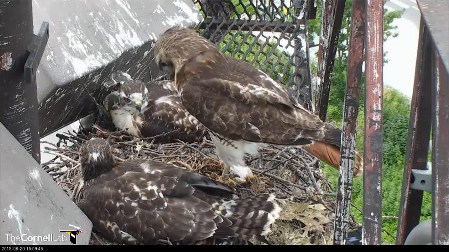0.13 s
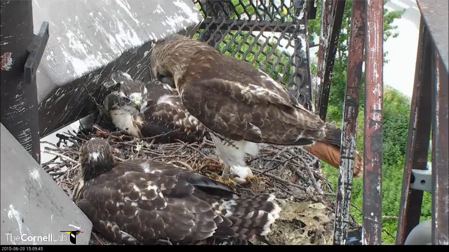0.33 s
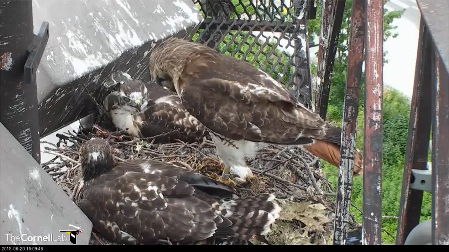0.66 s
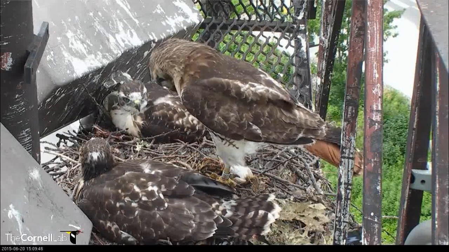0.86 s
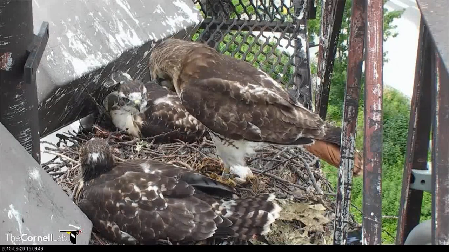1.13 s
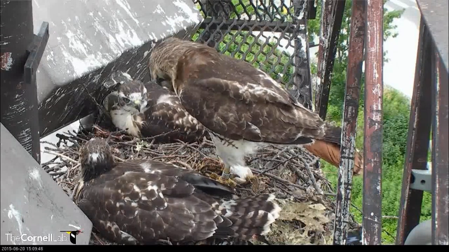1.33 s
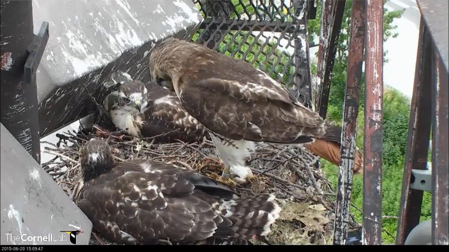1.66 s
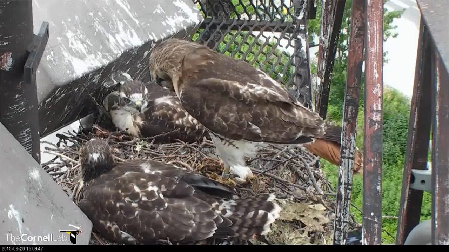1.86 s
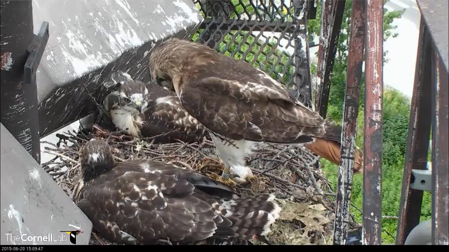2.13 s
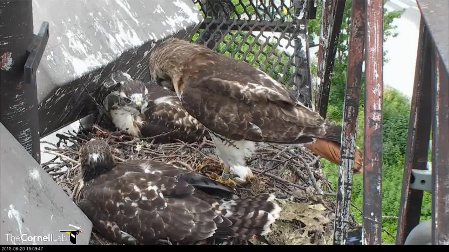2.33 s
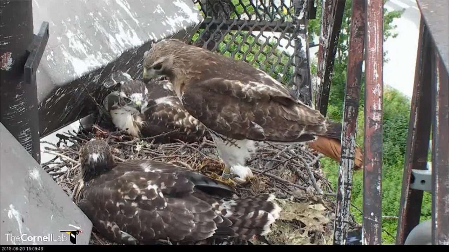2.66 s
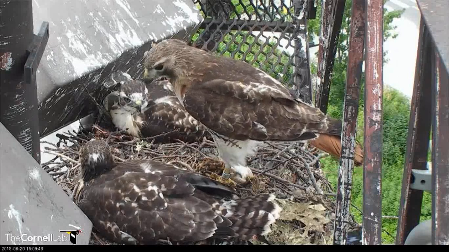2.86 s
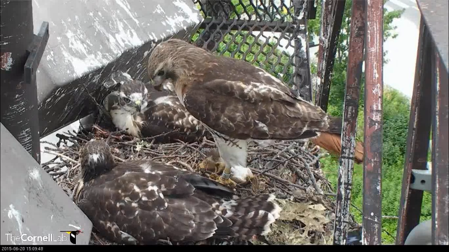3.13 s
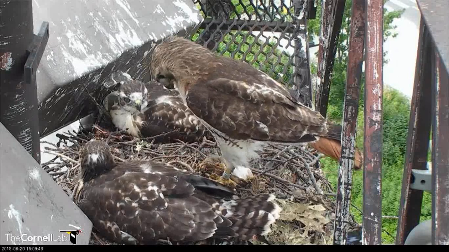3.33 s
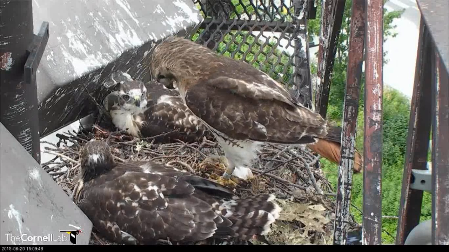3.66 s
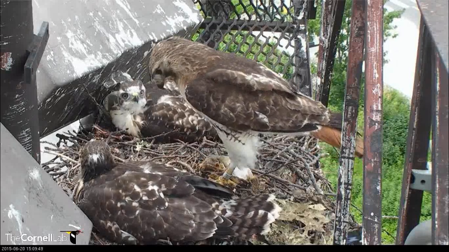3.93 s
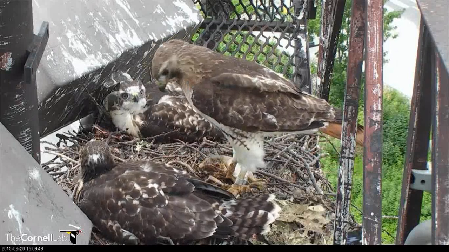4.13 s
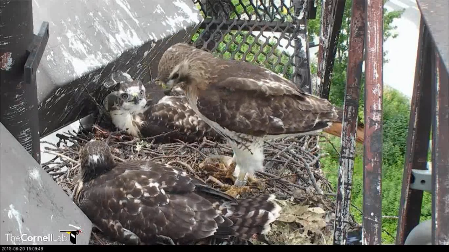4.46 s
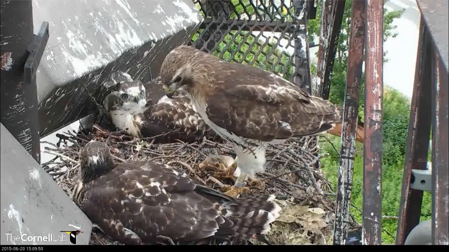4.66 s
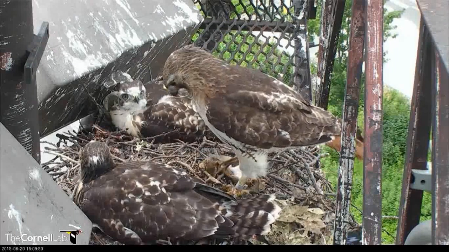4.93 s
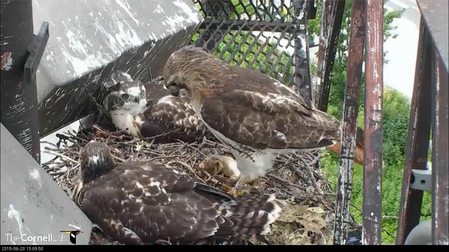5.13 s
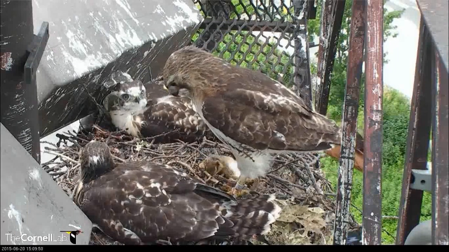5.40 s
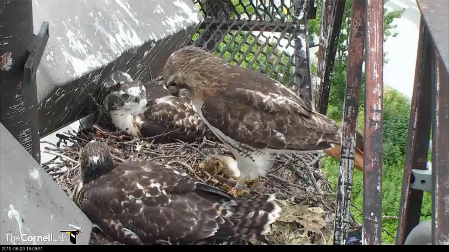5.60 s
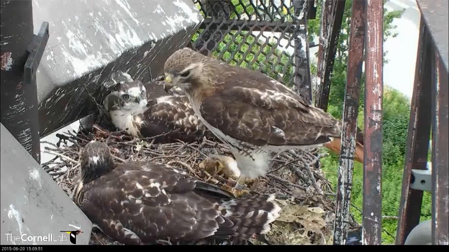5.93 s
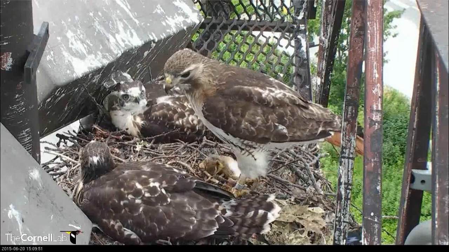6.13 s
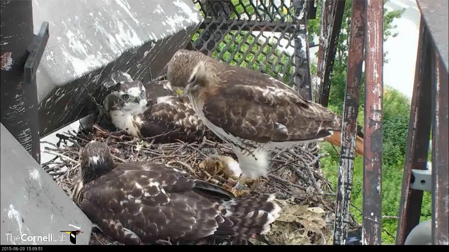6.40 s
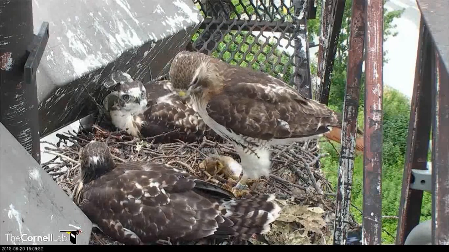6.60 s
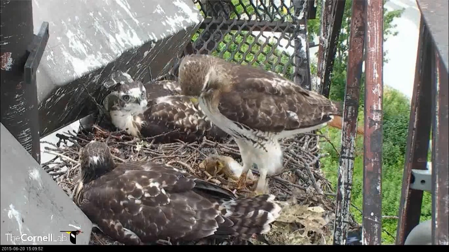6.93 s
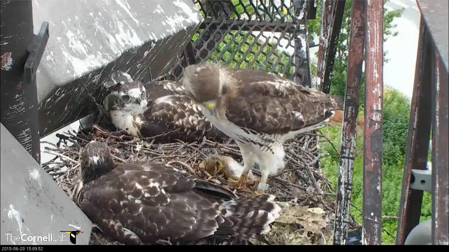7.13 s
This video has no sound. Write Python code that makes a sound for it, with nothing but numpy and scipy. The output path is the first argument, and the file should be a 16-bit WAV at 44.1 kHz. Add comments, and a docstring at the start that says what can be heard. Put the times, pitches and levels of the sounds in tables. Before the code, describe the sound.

Shrill nestling screams, thin arched whistles and rapid squeaky clucks repeat over low wind rumble and hiss; a distant wavering engine rises near the end.

```python
"""A nest on a steel light tower, where two hawk nestlings beg close to a fixed microphone.
They give long high screams, some dipping midway and some holding or climbing, that break downward; thin
arched whistles, quick chips, short slurs, one low whimper, and squeaks that drop into hoarse clucks.
Each voice is a gliding tone; screams, whistles and chips flare and fade as it crosses the voice's resonances.
Two dull bumps, wind and steady hiss are shaped noise; distant engines are wavering harmonics."""
import sys
import numpy as np
from scipy import signal
from scipy.fft import rfft, irfft
from scipy.io import wavfile

SR = 44100
rng = np.random.default_rng(int(sys.argv[2]) if len(sys.argv) > 2 else 0)


def transcribe(signal):
    """Save signal, clipped to [-1, 1], as a 16-bit WAV file at the path in sys.argv[1]."""
    frames = np.atleast_2d(signal).T
    limited = np.clip(frames, -1, 1)
    pcm = np.round(limited * 32767).astype(np.int16)
    wavfile.write(sys.argv[1], SR, pcm)


N = 320689  # length of the scene [samples]

# resonances that the pitch of a scream or whistle passes through: (pitch [Hz], level [dB])
VOICE_THROAT = [(2300, -14.5), (2480, -2.5), (2620, -2), (2680, -1.5), (2780, 4), (2900, -8), (3030, -11.5),
                (3160, -5.5), (3340, -13.5), (3460, -5), (3540, -11), (3600, -4), (3670, 0), (3790, -9),
                (4000, -6.5), (4400, 0.5), (4600, -23), (4770, -13), (5000, -18), (5600, -20)]
# squeaks that drop into a hoarse cluck: (time of the cluck [s], its pitch [Hz], its level before a boost [dB],
# time by which the squeak's downward flank leads [s], upward flank level [dB], downward flank level [dB]);
# the flanks are sounded with the chips, which are all turned down together
CLUCKS = [(2.103, 1207, -40, .021, -36, -14), (3.244, 818, -33, 0.013, -21, -23),
          (3.482, 798, -29.5, 0.0093, -40, -46), (3.722, 830, -26, .011, -32, -44),
          (3.933, 843, -24.5, .013, -40, -21), (4.159, 802, -30, 0.02, -42, -27),
          (4.405, 853, -24.5, .007, -29, -21), (4.627, 802, -28.5, 0.007, -26, -40),
          (4.823, 852, -18.5, 0.0087, -19, -15), (5.025, 843, -22.5, .01, -25, -24),
          (5.454, 825, -24, 0.03, -44, -18)]
# colour of broad rushing noise, in the wind and in the engine's roar: (frequency [Hz], relative level [dB])
RUSH_COLOUR = [(50, -9.5), (100, 6.5), (180, 4), (290, -0.5), (400, -3.5), (520, -8.5), (700, -15),
               (1000, -28), (1500, -38), (2500, -57)]


def undb(db):
    """Turn decibels into gain."""
    return 10 ** (np.asarray(db) / 20)


def unit(x):
    """Scale to an rms (average strength) of 1."""
    return x / np.sqrt(np.mean(x ** 2))


def shape_db(points, hz):
    """Read a level from (frequency [Hz], level [dB]) points, joined by lines on a log-frequency axis."""
    f, db = np.transpose(points)
    return np.interp(np.log(np.maximum(hz, 1)), np.log(f), db)


def noise(points, size):
    """Noise of rms 1: random samples whose spectrum is shaped by the given points."""
    hz = np.fft.rfftfreq(size, 1 / SR)
    spectrum = rfft(rng.standard_normal(size)) * undb(shape_db(points, hz))
    return unit(irfft(spectrum, size))


def wander(rate, size):
    """Smooth random curve of rms 1 that changes about rate times a second."""
    hz = np.fft.rfftfreq(size, 1 / SR)
    spectrum = rfft(rng.standard_normal(size)) * np.exp(-.5 * (hz / rate) ** 2)
    return unit(irfft(spectrum, size))


def phase_of(hz):
    """Running phase of a moving pitch."""
    return 2 * np.pi * np.cumsum(hz) / SR


def fade(size, fade_s):
    """Gain that opens and closes softly."""
    t = np.arange(size) / SR
    nearest_end_s = np.minimum(t, t[-1] - t)
    return np.sin(np.pi / 2 * np.clip(nearest_end_s / fade_s, 0, 1)) ** 2


def note(rows, fade_s):
    """Start time, pitch and softly opened and closed gain of a (time [s], pitch [Hz], level [dB]) curve."""
    s, hz, db = np.transpose(rows)
    t = np.arange(s[0] - fade_s / 2, s[-1] + fade_s / 2, 1 / SR)
    nearest_end_s = np.minimum(t - t[0], t[-1] - t)
    gate = np.sin(np.pi / 2 * np.clip(nearest_end_s / fade_s, 0, 1)) ** 2
    return t[0], np.interp(t, s, hz), gate * undb(np.interp(t, s, db))


def add(out, start_s, x):
    """Mix x into out from start_s on."""
    i = max(int(start_s * SR), 0)
    x = x[:max(N - i, 0)]
    out[i:i + len(x)] += x


def syrinx(hz, jitter, shimmer_db):
    """A bird's vocal membrane: the phase and flutter of a tone whose pitch and strength tremble."""
    size = len(hz)
    phase = phase_of(hz * (1 + jitter * wander(110, size)))
    flutter = np.sqrt(2) * undb(shimmer_db * wander(84, size))
    return phase, flutter


def screams():
    """A nearly pure tone with a weak octave; it turns rough as it breaks downward, and air rasps along."""
    # long screams: (start [s], first pitch point [s], its pitch [Hz], pitch midway [Hz],
    # latest second pitch point [s], its pitch [Hz], pitch shortly before the break [Hz], break [s],
    # high-pitch level [dB], level after the break [dB], octave level [dB]); levels are before the throat
    scream_rows = [(0.525, 0.594, 3747, 3583, 0.74, 3676, 3420, .808, -21, -15.5, -23.5),
                   (1.434, 1.556, 3588, 3636, 1.71, 3678, 3196, 1.805, -21, -19.5, -17),
                   (2.598, 2.678, 3528, 3406, 2.825, 3650, 3305, 2.968, -23, -25.5, -17.5),
                   (3.687, 3.769, 3517, 3588, 3.915, 3686, 3310, 4.057, -22, -22, -13.5),
                   (4.787, 4.984, 3720, 3506, 5.075, 3577, 3480, 5.122, -21, -18, -20),
                   (5.904, 6.006, 3660, 3663, 6.14, 3760, 3390, 6.255, -24, -25, -25)]
    # how the throat passes the octave: (frequency [Hz], level [dB])
    octave_throat = [(4500, -29), (5900, -13), (6500, -1), (7000, 0.5), (7400, -2.5), (7700, -6)]
    rasp_colour = [(1500, -15.5), (2200, -4.5), (2600, 7), (3000, -6.5), (3700, -5),
                   (4600, -24), (5800, -40.5), (6600, -11.5), (7500, -23)]
    accent_start_db, accent_s = 5.5, 0.021  # extra push at the start, and how fast it passes
    out = np.zeros(N)
    for *contour, high_db, low_db, octave_db in scream_rows:
        t, hz = scream_pitch(*contour)
        size = len(hz)
        hz = hz * (1 + 0.0022 * wander(23, size))
        slack = np.clip((3350 - hz) / 500, 0, 1)  # the membrane loses tension at low pitch
        phase, flutter = syrinx(hz, jitter=.0014 + .005 * slack, shimmer_db=.6 + 1.2 * slack)

        accent_db = accent_start_db * np.exp(-(t - t[0]) / accent_s)
        stutter_db = 2.0 * slack * wander(35, size)
        level_db = high_db + slack * (low_db - high_db) + shape_db(VOICE_THROAT, hz)
        gain = fade(size, 0.0099) * undb(level_db + stutter_db + accent_db)
        effort = np.sqrt(gain * gain.mean())  # the octave and the rasp swell less than the tone

        tone = gain * flutter * np.sin(phase)
        octave_level_db = octave_db + shape_db(octave_throat, 2 * hz) + 2.53 * wander(46, size)
        octave = (1 - slack) * undb(octave_level_db) * np.sin(2 * phase)
        rasp = undb(-12.0 - 2.6 * slack) * noise(rasp_colour, size)
        add(out, t[0], tone + effort * (flutter * octave + rasp))
    return out


def scream_pitch(start, first, first_hz, midway_hz, second, second_hz, shoulder_hz, breaks):
    """Times and pitch of a scream: a climb, a dip, hold or climb midway, then a flip down and a slide away."""
    onset_hz, break_hz, low_register_hz, end_hz = 3320, 3130, 2786, 2314
    shoulder_s = 0.025  # time before the break at which the voice begins to give way
    flip_s, slide_s = .013, 0.052  # length of the flip, and of the slide after it
    second = min(second, breaks - shoulder_s - .015)  # the voice always sinks before it breaks
    knots = [(start, onset_hz), (first, first_hz), ((first + second) / 2, midway_hz), (second, second_hz),
             (breaks - shoulder_s, shoulder_hz), (breaks, break_hz), (breaks + flip_s, low_register_hz),
             (breaks + flip_s + slide_s, end_hz)]
    s, hz = np.transpose(knots)
    t = np.arange(s[0], s[-1], 1 / SR)
    climb = np.minimum((t - start) / (first - start), 1)
    bow_hz = 70 * np.sin(np.pi * climb)  # the first climb is quick, then eases
    return t, np.interp(t, s, hz) + bow_hz


def whistles():
    """The pitch of a soft tone eases to a crest and drops ever faster; the highest notes waver."""
    # thin arched whistles and peeps: (start [s], rise [s], fall [s], first pitch [Hz], crest pitch [Hz],
    # last pitch [Hz], level before the throat [dB])
    whistle_rows = [(.338, 0.031, 0.16, 5380, 5470, 4180, -32.5), (1.1, 0.11, 0.016, 3180, 3460, 3360, -28),
                    (1.223, 0.036, 0.021, 3365, 3450, 3100, -21),
                    (1.285, 0.024, 0.13, 5200, 5120, 3870, -37),
                    (1.89, 0.081, 0.062, 3040, 3135, 3070, -32),
                    (2.355, 0.04, 0.061, 4690, 5040, 4860, -41),
                    (2.46, 0.094, 0.038, 4830, 5040, 4000, -36),
                    (3.441, 0.069, .175, 5200, 5370, 4340, -38), (4.55, 0.082, 0.13, 5060, 5280, 5030, -36),
                    (5.163, 0.13, 0.032, 3430, 4166, 3380, -22),
                    (5.595, 0.09, 0.1274, 3200, 4960, 3700, -25),
                    (5.649, 0.065, .19, 5140, 5570, 4360, -32),
                    (6.709, 0.019, 0.045, 3166, 4290, 3680, -22.5),
                    (6.765, 0.013, .055, 3947, 3950, 3080, -31.5),
                    (6.852, .022, 0.026, 3157, 3360, 3130, -22.5),
                    (7.175, 0.063, .04, 4780, 4790, 4780, -43.5)]
    drop_power = 3.0  # power of time by which the pitch falls from its crest
    swell_range_db, drop_fade_db = 3, 3  # growth from start to end, and loss as the pitch drops away
    out = np.zeros(N)
    for start, rise_s, fall_s, first_hz, top_hz, last_hz, db in whistle_rows:
        t = np.arange(0, rise_s + fall_s, 1 / SR)
        rising = np.sin(np.pi / 2 * np.minimum(t / rise_s, 1)) ** 2
        falling = np.maximum((t - rise_s) / fall_s, 0) ** drop_power
        hz = first_hz + (top_hz - first_hz) * rising + (last_hz - top_hz) * falling
        thin = np.clip((hz - 4000) / 1000, 0, 1)  # 1 for the highest notes
        hz = hz * (1 + 0.0043 * thin * wander(22, len(t)))

        swell_db = swell_range_db * (t / t[-1] - .5) - drop_fade_db * falling
        waver_db = (1.5 + 1.2 * thin) * wander(30, len(t))
        gain = fade(len(t), 0.0041) * undb(db + shape_db(VOICE_THROAT, hz) + swell_db + waver_db)
        add(out, start, soft_voice(hz, gain))
    return out


def soft_voice(hz, gain):
    """A softer, wavering tone; at low pitch it carries an octave."""
    hz = hz * (1 + .005 * wander(25, len(hz)))  # an unsteady young voice
    phase, flutter = syrinx(hz, jitter=0.0059, shimmer_db=3.0)
    octave_db = shape_db([(4600, -20.0), (5600, -24.0), (6300, -36.5)], 2 * hz)
    octave = undb(octave_db) * np.sin(2 * phase)
    effort = np.sqrt(gain / undb(-26.0))  # soft notes are nearly pure
    return gain * flutter * (np.sin(phase) + effort * octave)


def chips(loudest_hz=4400, lead_s=.0095, tail_s=0.02):
    """The pitch arches steeply up and back, its top too high and faint to hear; each flank flashes in the throat."""
    # loudness of a chip along its glide: (pitch [Hz], level [dB])
    chip_throat = [(2300, -30.5), (2700, -14), (3300, -13.5), (3900, -10.5), (4400, 0.5), (4800, -18.5),
                   (5300, -25), (6300, -32), (7200, -61)]
    out = np.zeros(N)
    t = np.arange(-lead_s, tail_s, 1 / SR)
    gate = np.interp(t, [-lead_s, -.4 * lead_s, .7 * tail_s, tail_s], [0, 1, 1, 0]) ** 2
    for s, db, glide in flanks():
        hz = loudest_hz * 2 ** np.clip(glide * t, -1, 1)
        phase, flutter = syrinx(hz, jitter=0.016, shimmer_db=2.4)
        rattle = 1 + .25 * wander(350, len(t))
        gain = undb(db + shape_db(chip_throat, hz)) * gate
        chip = gain * flutter * rattle * np.sin(phase)
        add(out, s + t[0], glance(chip, strength_db=-17))
    return out * undb(-4.5)


def flanks():
    """Time [s], level [dB] and glide [octaves per s] of both flanks of every chip and squeak."""
    # chips: (time of the upward flank [s], time until the downward one [s], upward level [dB],
    # downward level [dB], downward glide [octaves per s]); chips() turns all levels down together
    chip_rows = [(.061, 0.067, -19, -15, -34), (.253, .043, -13, -12.5, -41), (.644, .05, -17, -15.5, -35),
                 (.837, 0.046, -17, -13.5, -29), (1.024, 0.044, -15.5, -10.5, -38),
                 (3.01, 0.056, -16, -13.5, -26), (3.18, .042, -17, -14, -32),
                 (3.364, 0.039, -25.5, -17, -33.5), (3.57, .043, -16, -15, -39),
                 (3.785, .046, -22, -12.5, -33), (3.987, .049, -28, -15, -27),
                 (4.301, 0.053, -13.5, -17, -31.5), (4.511, 0.051, -15, -13.5, -32),
                 (4.726, 0.046, -12.5, -12.5, -31)]
    rise_glide, squeak_fall_glide = 61, -27.5  # [octaves per s]
    squeak_s = .071  # from a squeak's upward flank to its downward one
    for s, gap_s, up_db, down_db, fall_glide in chip_rows:
        yield s, up_db, rise_glide
        yield s + gap_s, down_db, fall_glide
    for s, _, _, lead_s, up_db, down_db in CLUCKS:
        yield s - lead_s - squeak_s, up_db, rise_glide
        yield s - lead_s, down_db, squeak_fall_glide


def clucks(glide=-8, attack_s=0.0046, release_s=0.0047):
    """The voice drops into a low register for a few rough cycles, rich in harmonics."""
    # throat shape in a cluck: (frequency [Hz], level [dB])
    cluck_throat = [(850, -31.5), (1300, -17.5), (1700, -8), (2500, -6), (3300, 1.5), (4200, -24.5),
                    (5000, -32.5), (7000, -41.5)]
    out = np.zeros(N)
    t = np.arange(-SR // 50, SR // 50) / SR
    swell = np.exp(-.5 * (t / np.where(t < 0, attack_s, release_s)) ** 2)
    for s, pitch, db, *_ in CLUCKS:
        hz = pitch * 2 ** (glide * t)  # glide in octaves per s
        phase, flutter = syrinx(hz, jitter=0.018, shimmer_db=3.5)
        voice = np.zeros(len(t))
        for k in range(1, 9):
            harmonic_db = shape_db(cluck_throat, k * hz) + 2 * wander(270, len(t))
            voice += undb(harmonic_db) * np.sin(k * phase)
        cluck = undb(db + 2.5) * swell * flutter * voice
        add(out, s + t[0], glance(cluck, strength_db=-18.5))
    return out


def glance(x, strength_db):
    """A few near surfaces throw a short call back; the paths change as the head turns, drawn anew per call."""
    paths = rng.uniform(size=(5, 2))
    lag = (.004 + .02 * paths[:, 0]) * SR
    echoes = np.zeros(SR // 30)
    echoes[lag.astype(int)] = undb(strength_db) * (1 - paths[:, 0] / 2) * np.sign(paths[:, 1] - .5)
    echoes[0] = 1  # the direct sound
    return signal.fftconvolve(x, echoes)


def whimper():
    """The same soft voice as the whistles, held low and wavering, around the last scream."""
    # the whimper's path: (time [s], pitch [Hz], level [dB])
    whimper_path = [(5.82, 2850, -34), (5.85, 3000, -33), (5.906, 2670, -27), (5.945, 2814, -29),
                    (6.006, 2466, -24.5), (6.069, 2315, -27.5), (6.157, 2650, -31.5), (6.173, 2250, -37),
                    (6.193, 2290, -35)]
    out = np.zeros(N)
    start, hz, gain = note(whimper_path, fade_s=0.013)
    waver = undb(1.8 * wander(30, len(hz)))
    add(out, start, soft_voice(hz, gain * waver))
    return out


def slurs():
    """Short slurred tones: soft whines, and the low tail ends of falling chips and squeaks."""
    # slurs: (start [s], length [s], first pitch [Hz], last pitch [Hz], level [dB])
    slur_rows = [(0.15, 0.013, 2840, 2350, -31.5), (2.1, 0.0089, 2580, 2100, -27.5),
                 (2.15, 0.057, 2760, 2680, -38), (2.466, 0.097, 2110, 1670, -46.5),
                 (2.888, 0.063, 1580, 1730, -46), (2.949, .15, 1530, 1380, -48),
                 (4.172, 0.045, 2920, 2750, -46.5), (5.057, 0.034, 2450, 2620, -28),
                 (5.432, 0.014, 2930, 2300, -21.5), (5.452, 0.13, 3340, 2870, -45),
                 (5.609, 0.088, 2870, 2826, -36.5), (5.719, .022, 3410, 3070, -37.5),
                 (5.744, 0.047, 2620, 2250, -34), (5.811, 0.086, 3280, 3090, -38.5),
                 (6.333, .032, 2495, 2520, -33.5), (6.403, 0.041, 2560, 2563, -38),
                 (7.2, 0.045, 2950, 2670, -35)]
    out = np.zeros(N)
    for s, length, first_hz, last_hz, db in slur_rows:
        start, hz, gain = note([(s, first_hz, db), (s + length, last_hz, db)], fade_s=0.0088)
        phase, flutter = syrinx(hz, jitter=0.0031, shimmer_db=3.0)
        add(out, start, gain * flutter * np.sin(phase))
    return out


def tower(x, t60_s=0.1, echo_db=-19):
    """Beams and grating scatter a short, faint tail of noise that dies away by 60 dB in t60_s."""
    t = np.arange(SR // 3) / SR
    tail = noise([(1000, -4.5), (2700, 7.5), (3600, 6.5), (5000, -6.5), (8000, -15.0), (12000, -33.5)], len(t))
    tail = tail * undb(-60 * t / t60_s) * (t > .002)
    tail = tail / np.abs(rfft(tail))[:len(t) // 6].mean()  # set its mean strength over the lower spectrum to 1
    return x + undb(echo_db) * signal.fftconvolve(x, tail)[:N]


def bumps():
    """The adult shifts its weight on the nest; packed sticks give a short, low knock without a ring."""
    # bumps: (time [s], level [dB], decay [s])
    bump_rows = [(2.267, -5, 0.0086), (3.431, -12.5, 0.011)]
    # colour of the knock: (frequency [Hz], relative level [dB])
    bump_colour = [(100, -3.5), (280, 5), (500, 0), (750, -14.5), (1200, -27), (2500, -59)]
    out = np.zeros(N)
    t = np.arange(SR // 10) / SR
    for s, db, decay in bump_rows:
        envelope = np.minimum(t / 0.0016, 1) * np.exp(-t / decay)
        add(out, s, undb(db) * envelope * noise(bump_colour, len(t)))
    return out


def wind():
    """Deep buffeting and a broader rush at the microphone follow the same gusts and sway in quick eddies."""
    # strength of the gusts: (time [s], level [dB])
    gusts = [(0, -16.5), (.22, -11), (.31, -26), (.43, -12), (.75, -17), (1.07, -16.5), (1.27, -7.5),
             (1.36, -16), (1.66, -10.5), (1.82, -14), (2.47, -8), (2.599, -16.5), (3.48, -20.5),
             (3.81, -22.5), (4.58, -20.5), (4.68, -25.5), (5.3, -17), (5.56, -26.5), (6.14, -26.5),
             (7.27, -28)]
    # colour of the buffeting: (frequency [Hz], relative level [dB])
    buffet_colour = [(12, -18), (28, 12.5), (50, 11), (80, 5.5), (130, -1.5), (200, -19.5), (400, -67.5)]
    gust_db = np.interp(np.arange(N) / SR, *np.transpose(gusts))
    eddies = wander(26, N)
    buffet = undb(-0.5 + gust_db + 1.8 * eddies) * noise(buffet_colour, N)
    # the rush follows only 0.6 of the gusts' swing in dB
    rush = undb(-11 + 0.6 * gust_db + 2.55 * eddies) * noise(RUSH_COLOUR, N)
    return buffet + rush


def air():
    """Smooth hiss of the open surroundings: shaped noise that sways very slightly."""
    # colour of the hiss: (frequency [Hz], relative level [dB])
    air_colour = [(400, 0), (800, 0), (1300, -7.5), (1700, -11.5), (2100, -11.5), (2400, -4), (2680, 2),
                  (3050, -6), (3900, -11.5), (4700, -25), (5600, -27), (6500, -26), (7400, -31.5),
                  (9000, -36)]
    sway_db = .4 * wander(2, N)
    return undb(-36 + sway_db) * noise(air_colour, N)


def traffic(full_db=-17):
    """Far engines: low harmonics that waver on their way through moving air; the deepest arrive first."""
    # distant engine: (time [s], pitch of its third harmonic before the waver [Hz], level [dB])
    engine_path = [(5.65, 293, -50), (5.93, 295.3, -35.5), (6.08, 267.3, -23), (6.27, 305.6, -15.5),
                   (6.32, 283.4, -20), (6.39, 324.2, -14.5), (6.46, 263.7, -16), (6.55, 314.4, -17.5),
                   (6.66, 255.6, -18), (6.76, 280.9, -19), (7.05, 267, -21.5), (7.27, 286.3, -20.5)]
    # its harmonics: (multiple of the firing rate, level at full swell [dB],
    # share of the swell that it follows, phase blur [rad])
    engine_orders = [(1, -10, 0.041, 0.53), (2, -5.5, 0.31, 1), (3, 0.5, 1, 0.75), (4, -13, 1, 1.7)]
    # a faint motor pulling away far off: (time [s], pitch of its third harmonic [Hz], level [dB])
    far_motor_path = [(2.95, 355, -49), (3.25, 376, -31.5), (3.5, 397, -33), (3.7, 410, -37),
                      (3.9, 395, -43)]
    waver_share, waver_hz = .02, 6.3  # how far the engine's pitch wavers, and how often
    out = np.zeros(N)

    start, hz, gain = note(engine_path, fade_s=0.055)
    size = len(hz)
    waver = np.sin(phase_of(waver_hz * (1 + 0.187 * wander(3, size))))
    hz = hz * (1 + waver_share * waver)
    firing = phase_of(hz / 3)
    for order, db, share, blur in engine_orders:
        phase = round(order) * firing + blur * wander(25, size)
        swell = (gain / undb(full_db)) ** abs(share)
        strength = undb(full_db + db + 2.17 * wander(22, size))
        add(out, start, np.sqrt(2) * swell * strength * np.sin(phase))
    roar = undb(-9.5) * gain * noise(RUSH_COLOUR, size)  # broad noise that swells with the engine
    add(out, start, roar)

    start, hz, gain = note(far_motor_path, fade_s=.1)
    phase = phase_of(hz)
    motor = np.sin(phase) + undb(-3) * np.sin(phase * (2 / 3))  # third and second harmonics
    add(out, start, np.sqrt(2) * gain * undb(2.3 * wander(1.9, len(hz))) * motor)
    return out


def scene():
    """The nestlings among the steelwork, over bumps, wind, hiss and distant engines."""
    birds = tower(screams() + whistles() + whimper() + slurs() + chips() + clucks())
    return (birds + bumps() + wind() + air() + traffic())[None]


def record(dry):
    """The microphone channel rounds loud peaks and passes a narrow band; a trace of hiss reaches above it."""
    rounded = dry / (1 + (dry / .97) ** 6) ** (1 / 6)
    narrow_band = signal.ellip(10, .2, 70, 7550, fs=SR, output="sos")
    narrow = signal.sosfilt(narrow_band, rounded)
    hiss = undb(-80) * rng.standard_normal(N)  # electronic hiss
    top_band = signal.ellip(8, .2, 70, 14000, fs=SR, output="sos")
    return signal.sosfilt(top_band, narrow + hiss)


dry = scene()
out = record(dry)
transcribe(out)
```